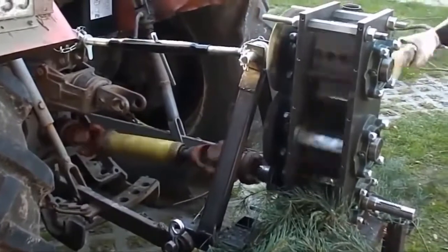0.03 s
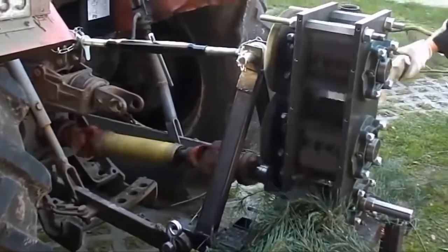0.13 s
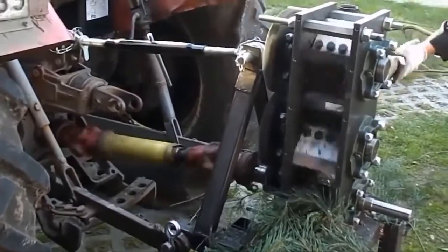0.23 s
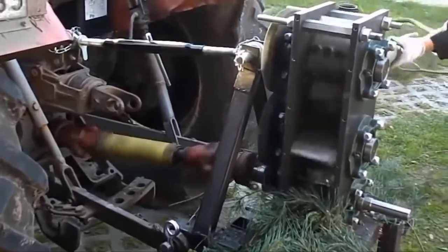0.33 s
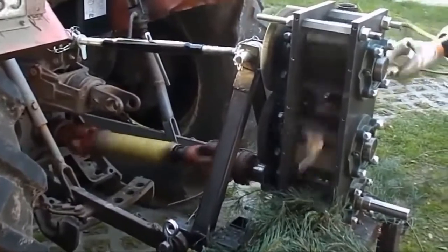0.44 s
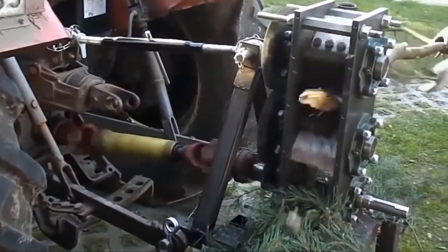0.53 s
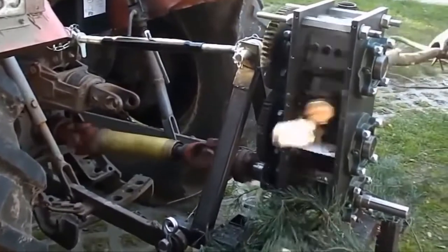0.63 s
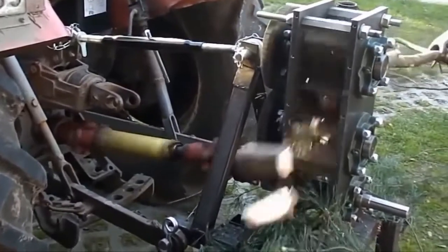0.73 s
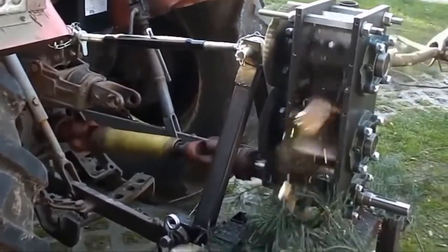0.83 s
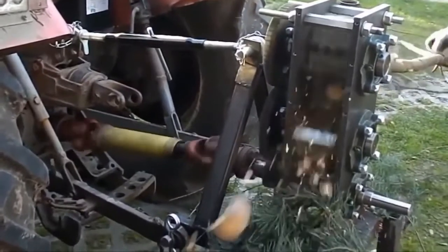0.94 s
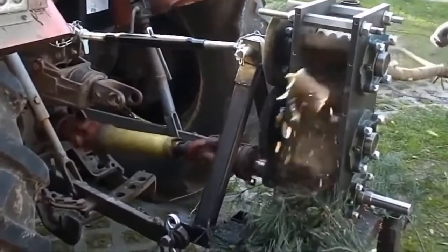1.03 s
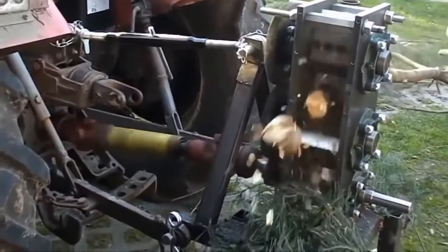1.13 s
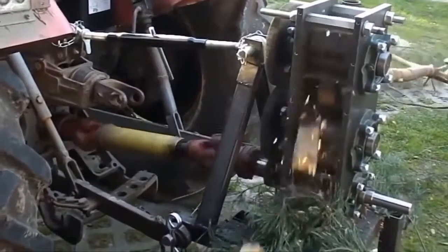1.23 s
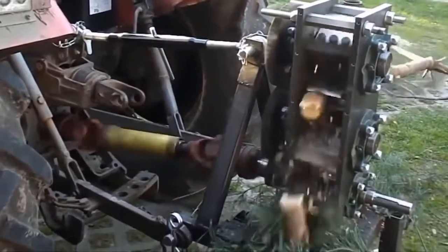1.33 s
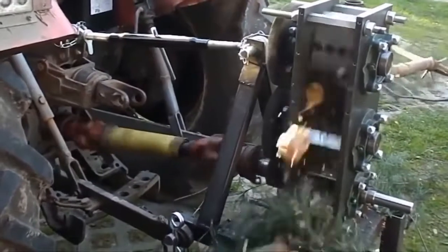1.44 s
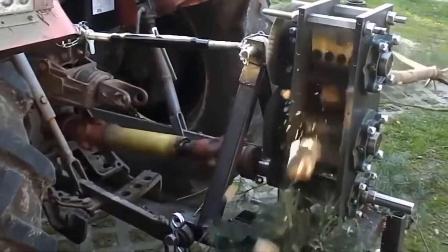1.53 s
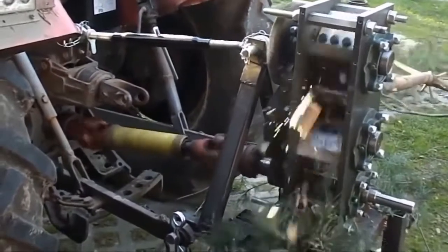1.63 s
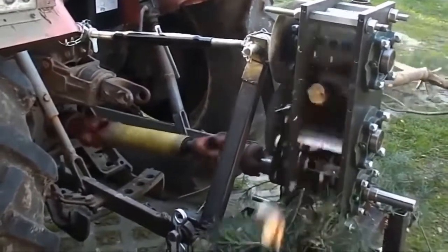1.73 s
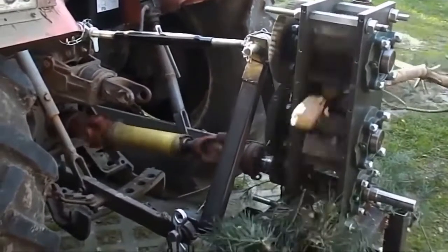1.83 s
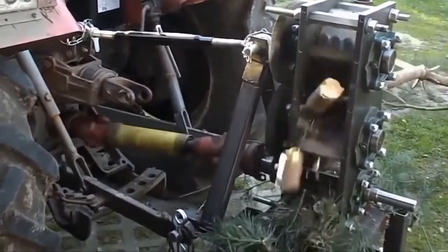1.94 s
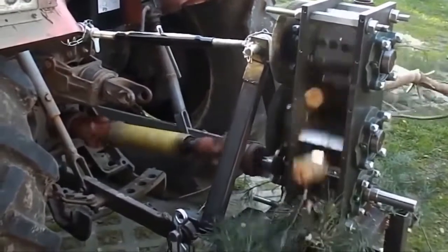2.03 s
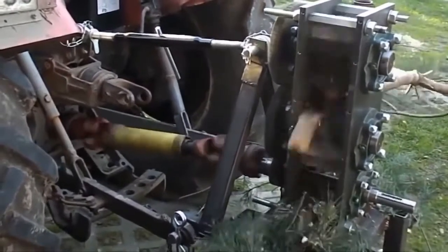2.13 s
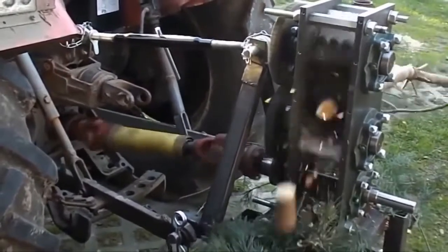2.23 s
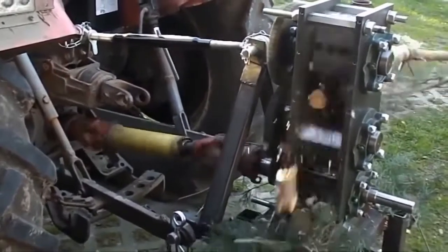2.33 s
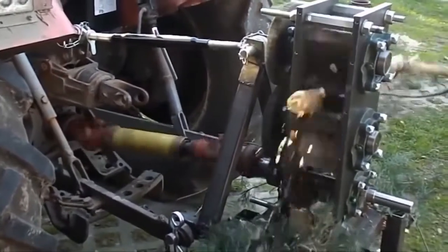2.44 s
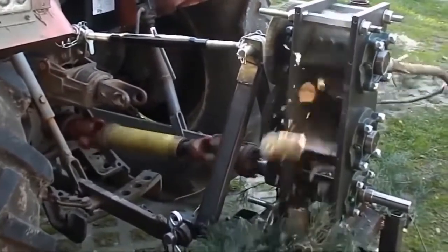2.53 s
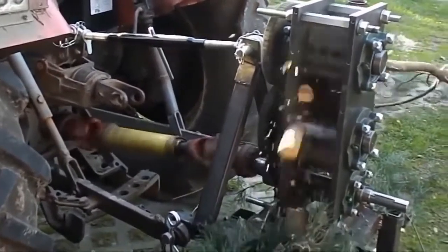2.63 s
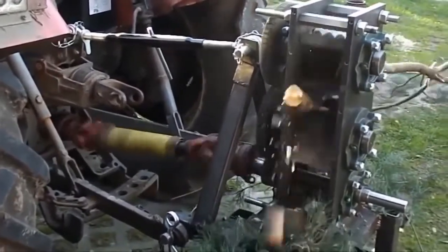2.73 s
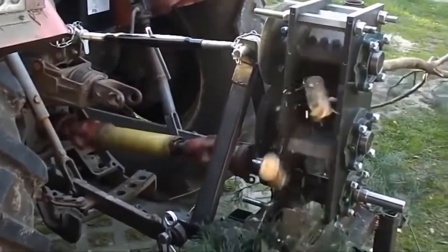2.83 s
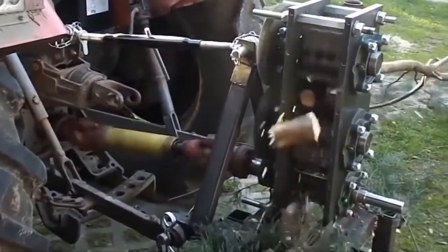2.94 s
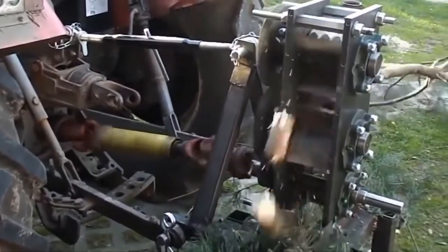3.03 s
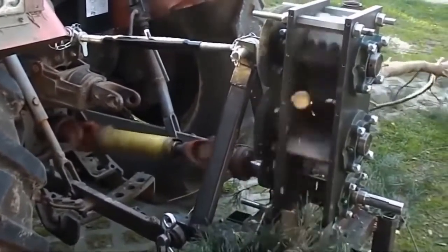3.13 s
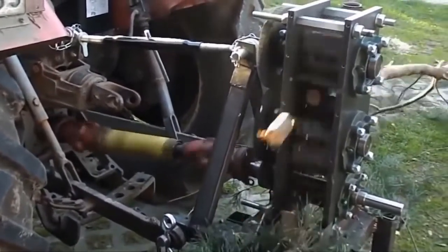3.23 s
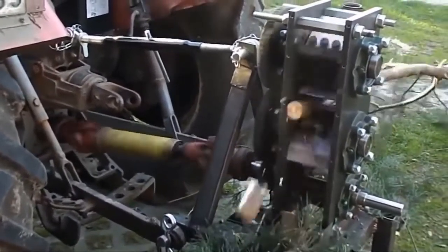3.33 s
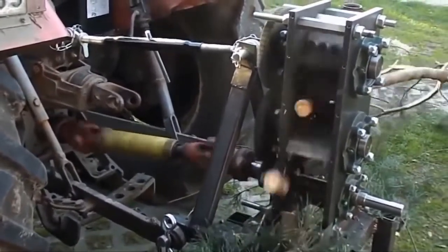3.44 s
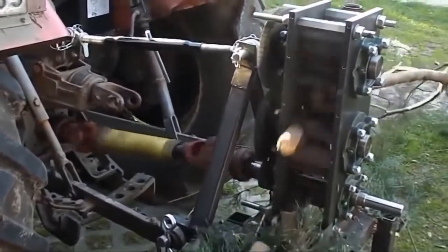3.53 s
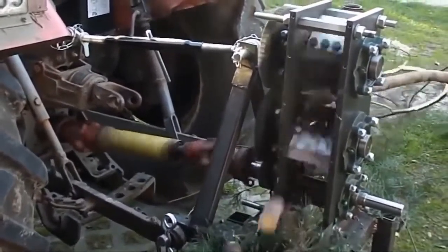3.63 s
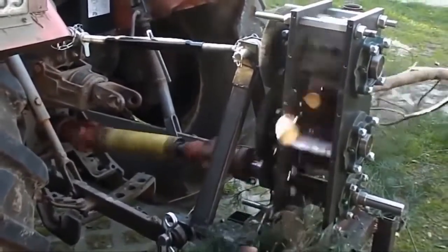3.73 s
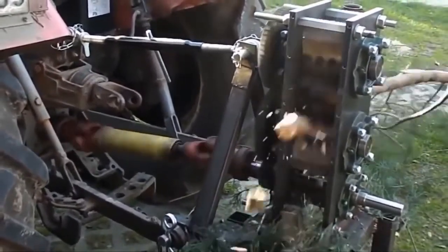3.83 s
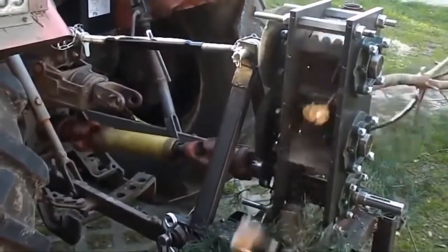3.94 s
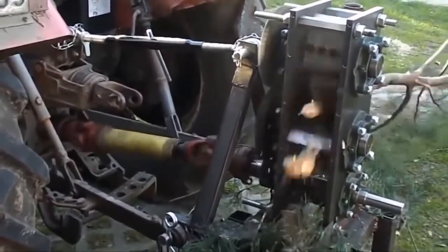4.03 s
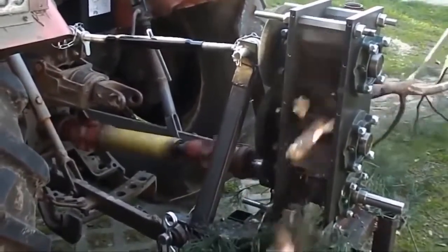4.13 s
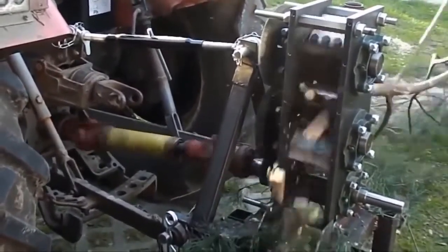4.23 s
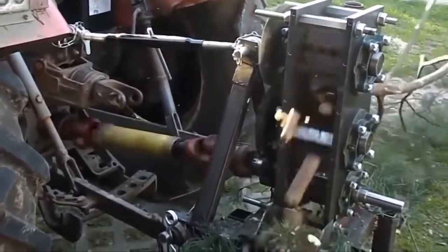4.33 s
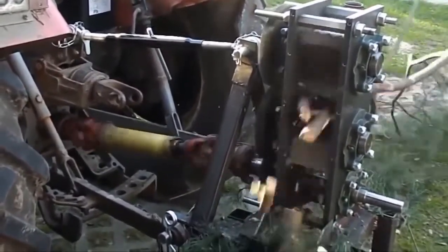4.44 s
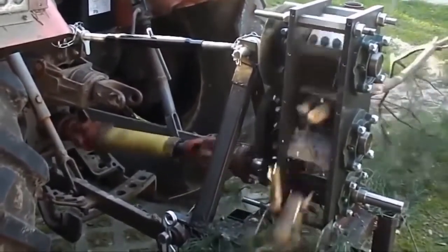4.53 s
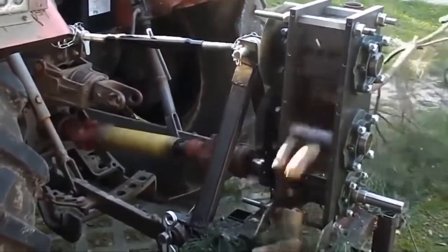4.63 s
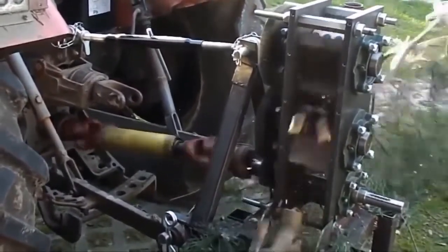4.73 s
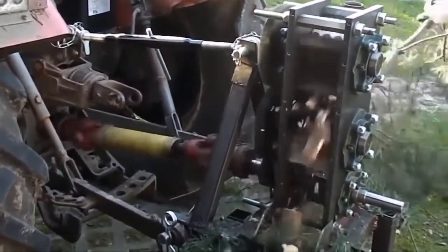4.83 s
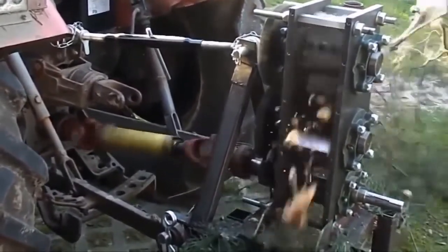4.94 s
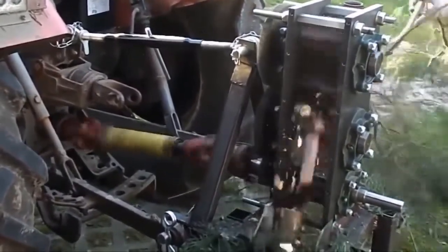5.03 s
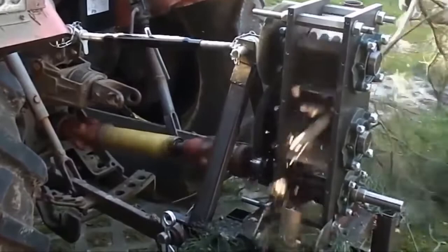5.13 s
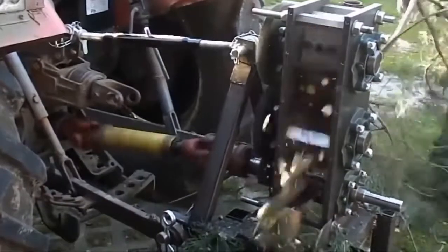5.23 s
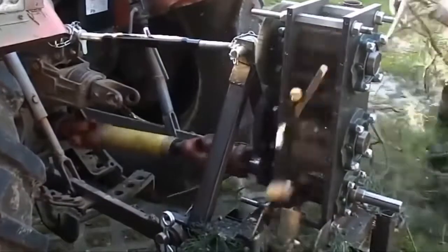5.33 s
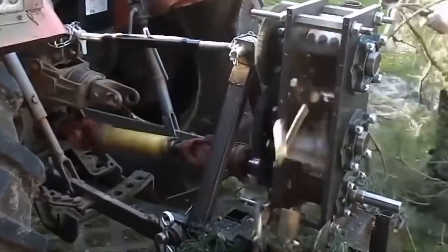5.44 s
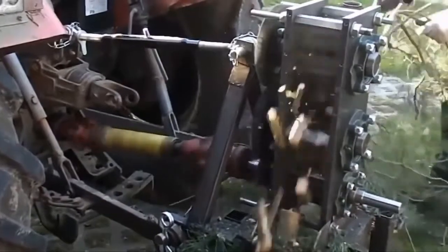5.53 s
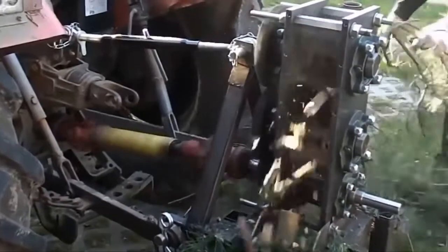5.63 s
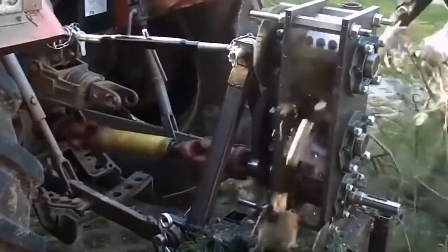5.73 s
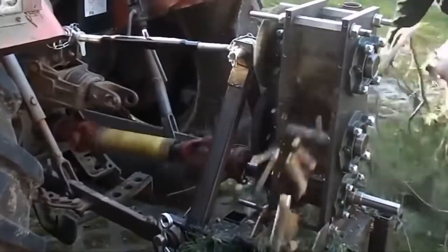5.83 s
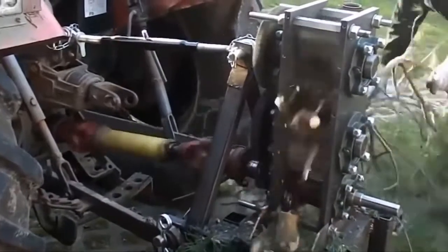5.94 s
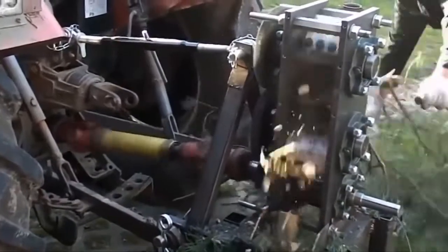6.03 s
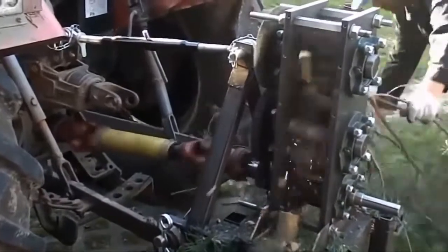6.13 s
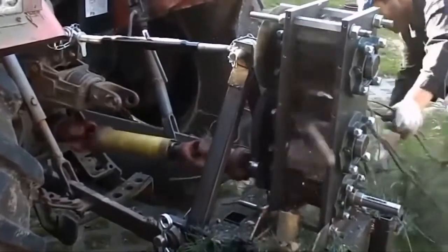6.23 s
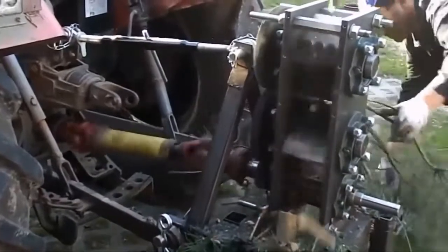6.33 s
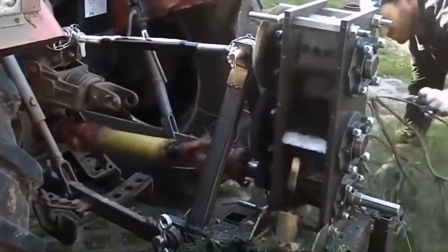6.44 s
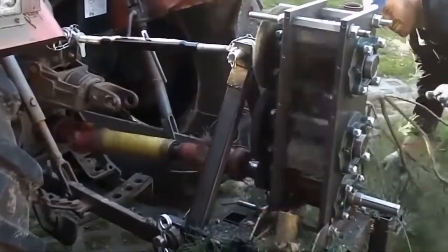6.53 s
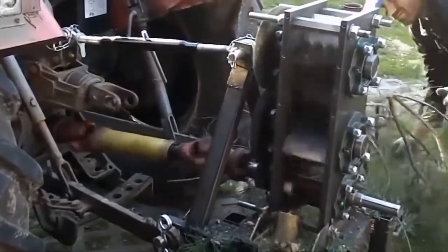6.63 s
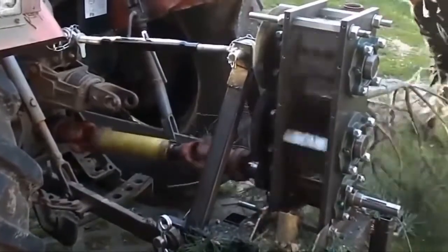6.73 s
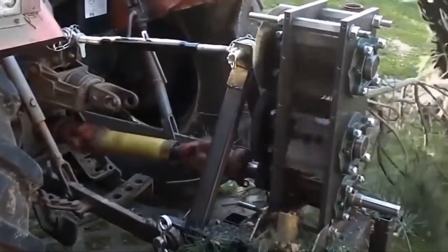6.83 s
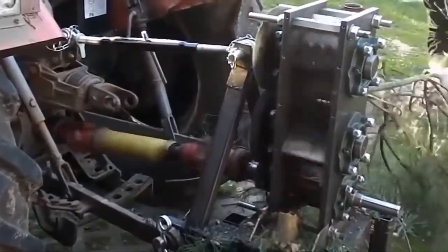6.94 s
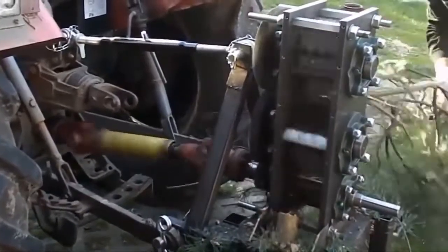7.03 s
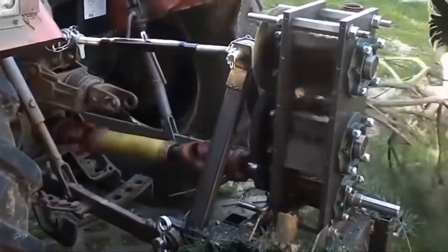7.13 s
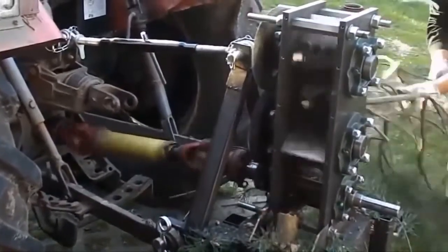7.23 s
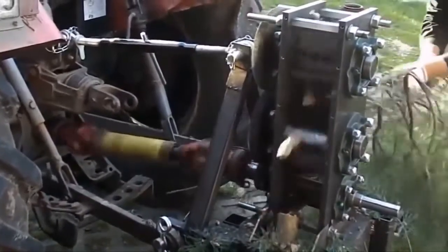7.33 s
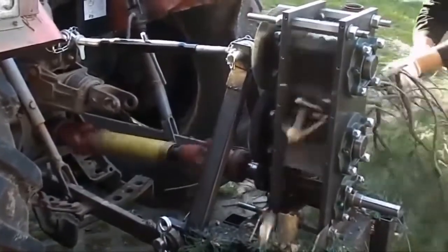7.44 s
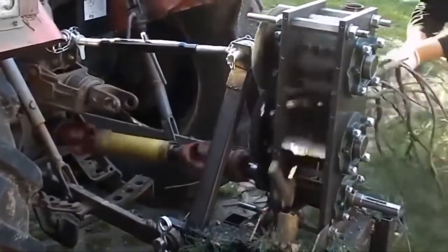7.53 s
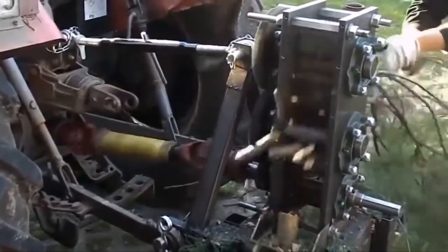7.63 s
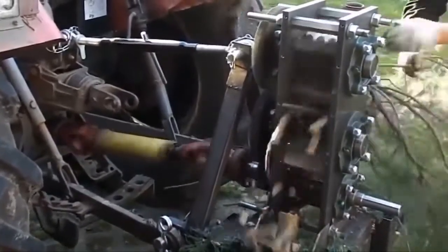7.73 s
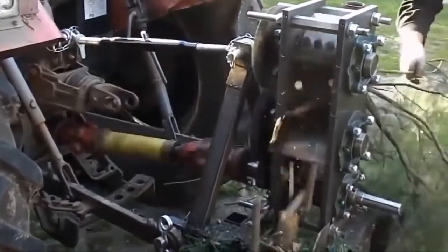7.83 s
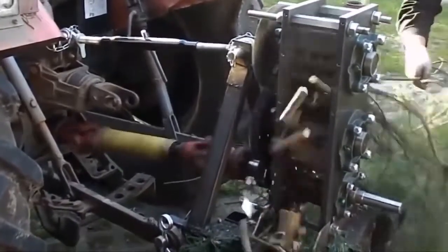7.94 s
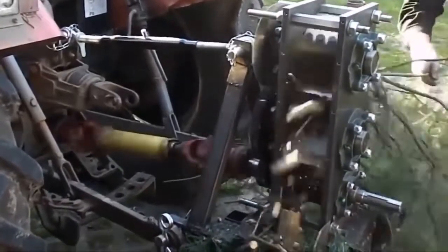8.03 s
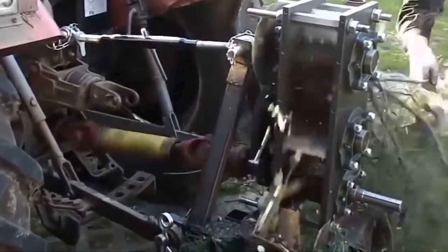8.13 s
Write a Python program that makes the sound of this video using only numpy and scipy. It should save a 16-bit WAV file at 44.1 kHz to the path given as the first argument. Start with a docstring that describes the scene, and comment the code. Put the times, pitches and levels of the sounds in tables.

```python
"""Tractor and wood chopper outdoors

A diesel tractor runs at low revs and turns a drum chopper through its power shaft, close by.
The knives cut wood about 6.5 times a second: noise bursts crush, crack and tear, and struck steel rings.
Each cut jolts the frame (a low damped swing) and slows the engine (firing knocks, ticks and panel hum).
Loose parts rattle, drive parts clank and cut pieces drop, all as short rings; a limiter ducks the loud peaks."""
import sys
import numpy as np
from scipy import signal
from scipy.fft import rfft, irfft
from scipy.io import wavfile
from scipy.ndimage import uniform_filter1d, minimum_filter1d

SR = 44100
rng = np.random.default_rng(int(sys.argv[2]) if len(sys.argv) > 2 else 0)


def wav_record(signal):
    """Record a signal, one row per channel, as 16-bit PCM in the file named by sys.argv[1]."""
    frames = np.transpose(np.atleast_2d(signal))
    bounded = np.clip(frames, -1, 1)
    # unit amplitude maps onto the largest positive 16-bit level
    quanta = np.round(bounded * 32767).astype(np.int16)
    wavfile.write(sys.argv[1], SR, quanta)


N = 360738


def undb(db):
    """Turn decibels into a gain."""
    return 10 ** (np.asarray(db) / 20)


def unit(x):
    """Scale to an average (rms) level of 1."""
    return x / np.sqrt(np.mean(x ** 2))


def add(track, s, sound):
    """Mix a sound into the track at time s, in seconds."""
    start = max(int(s * SR), 0)
    part = sound[:, :max(N - start, 0)]
    track[:, start:start + part.shape[1]] += part


def gains(points, size):
    """Draw a smooth curve through (pitch, level) points and read a gain for each transform bin."""
    hz, db = np.transpose(points)
    bins_hz = np.fft.rfftfreq(size, 1 / SR)
    return undb(np.interp(np.log(bins_hz + 1), np.log(hz), db))


def colour(x, points, size=4096):
    """Filter to the given spectrum without any sound before its cause; white noise keeps its power."""
    # folding the cepstrum forward in time makes the filter respond as early as it can
    cepstrum = irfft(np.log(gains(points, size)))
    cepstrum[1:size // 2] *= 2
    cepstrum[size // 2 + 1:] = 0
    response = irfft(np.exp(rfft(cepstrum)))
    response /= np.linalg.norm(response)
    return signal.fftconvolve(x, response[None])[:, :N]


def grit(size, spread_db, order=32):
    """Make mid and side noise from tiny grains of uneven strength, each `order` samples long."""
    grain_db = spread_db * np.clip(rng.standard_normal(size // order + 1), -2, 2)
    grains = np.repeat(undb(grain_db), order)[:size]
    return unit(grains * rng.standard_normal((2, size)))


def ring(modes, contact_s, scatter_db, detune):
    """Strike a body with (pitch, level, ring time) tones that die away; each blow lands on a different spot."""
    hz, db, t60 = np.transpose(modes)
    t = np.arange(int(t60.max() * SR)) / SR
    size = undb(db + scatter_db * rng.standard_normal(len(hz)))
    hz = hz * np.exp(detune * rng.standard_normal(len(hz)))
    # each tone falls by 60 dB in its t60
    waves = np.exp(np.outer(2j * np.pi * hz - np.log(1000) / t60, t))
    phases = np.exp(2j * np.pi * rng.random((2, len(hz))))
    weights = size / np.linalg.norm(size) * phases
    onset = 1 - np.exp(-t / contact_s)
    return np.sqrt(2) * (weights @ waves).imag * onset


def walk(rate):
    """Wander smoothly at random, with `rate` new values a second and a spread near 1."""
    return np.interp(np.arange(N) / SR * rate, np.arange(SR), 1.2 * rng.standard_normal(SR))


def yard(x, echo_db=-19, decay_s=0.043):
    """Ground, wheels and a wall scatter a short, dull echo, made of fading noise."""
    t = np.arange(SR // 3) / SR
    dull = signal.lfilter(*signal.butter(1, 4000, fs=SR), rng.standard_normal((2, len(t))))
    # the first echo takes 8 ms to come back
    response = dull * np.exp(-t / decay_s) * (t > .008)
    response /= np.linalg.norm(response[0])
    return x + undb(echo_db) * signal.fftconvolve(x, response, axes=1)[:, :N]


# tones of the loose linkage and guards: (pitch [Hz], level [dB], time to fall 60 dB [s])
LINKAGE_TONES = [(487, -4, 0.06), (777, -1, 0.041), (1105, 3, 0.039), (1335, 0.5, 0.038),
                 (1893, -4.5, 0.04), (2400, -1.5, 0.055)]


def rattles(rattle_db=-20, clink_db=-21, clink_spread_db=14, rattle_count=600, clink_count=90):
    """The linkage chatters all the time, and now and then the shaft joints clink, as small struck rings."""
    out = np.zeros((2, N))
    for when, size in rng.random((rattle_count, 2)):
        rattle = ring(LINKAGE_TONES, contact_s=.0006, scatter_db=3, detune=.14)
        add(out, when * N / SR, undb(rattle_db + 9 * (size - .5)) * rattle)
    modes = [(hz, db, share * .12) for hz, db, share in DRIVE_TONES]
    for when, size in rng.random((clink_count, 2)):
        clink = ring(modes, contact_s=.001, scatter_db=6, detune=.025)
        add(out, when * N / SR, undb(clink_db + clink_spread_db * (size - .5)) * clink)
    # the rattles and clinks carry no bass
    return signal.sosfilt(signal.butter(4, 260, "high", fs=SR, output="sos"), out)


def load(flywheel_s=.55):
    """Each cut brakes the flywheel, which slowly recovers; load 1 is a steady run of 0 dB cuts."""
    blows = np.zeros(N)
    for s, db, _ in CUTS:
        blows[int(s * SR)] += undb(db)
    spacing_s = np.median(np.diff(np.array(CUTS)[:, 0]))
    return signal.lfilter([spacing_s / flywheel_s], [1, -np.exp(-1 / (flywheel_s * SR))], blows)


# engine speed with no load, and how far it drops at load 1 [firings per second]
FREE_FIRING_HZ, SAG_HZ = 31.64, 1.9
# engine level with no load, and how much louder it works at load 1 [dB]
ENGINE_DB, LABOUR_DB = -22, 3.5
# strength of each cylinder's knock, in firing order: level [dB]
CYLINDER_LEVELS = [2, -1, -2, 1.2]
# clatter of block and gears: (pitch [Hz], level [dB per Hz])
CLATTER_SPECTRUM = [(24, -104), (40, -73), (81, -23), (137, -21.5), (392, 0), (646, -7), (790, 0),
                    (1150, -1.5), (1480, -13), (1900, -5.5), (2500, -13.5), (2770, -10.5), (3380, -16),
                    (6820, -28), (16000, -41)]
# tones of the castings and panels: (pitch [Hz], width [Hz], level [dB])
PANEL_TONES = [(355, 28, -9), (445.7, 8.2, -7), (703, 29, -7.5), (818, 26, -5), (933, 16, -7.5),
               (1127, 20, -1), (1165, 8.1, 1), (1216, 17, -13), (1322, 21, -0.5), (1550, 50, -5),
               (1903, 17, -9), (2440, 32, -7), (2600, 70, -33)]


def tractor(tick_db=-6, gear_db=-1, panel_db=-2.0, shudder_db=4.0, tick_count=24):
    """Firing knocks, valve and pump ticks and gear rattle are noise that shakes the block and its panels."""
    effort = load()
    firing = np.cumsum(FREE_FIRING_HZ - SAG_HZ * effort) / SR
    stroke = firing.astype(int)
    cylinder_db = np.array(CYLINDER_LEVELS)[stroke % len(CYLINDER_LEVELS)]
    strength = undb(cylinder_db + 0.46 * rng.standard_normal(SR)[stroke])
    # each knock fades until the next firing
    knocks = unit(strength * np.exp(-(firing % 1)) * rng.standard_normal((2, N)))

    # valves and injection pump strike at the same crank angles in every cycle
    cycle = firing / len(CYLINDER_LEVELS)
    angles_in_cycle = (np.arange(tick_count) + rng.random(tick_count)) / tick_count
    angles = (np.arange(int(cycle[-1]) + 1)[:, None] + angles_in_cycle).ravel()
    ticks = np.zeros(N)
    ticks[np.searchsorted(cycle, angles[angles < cycle[-1]])] = 1
    tick_fade = signal.lfilter([1], [1, -np.exp(-1 / (0.004 * SR))], ticks)
    ticks = unit(tick_fade * rng.standard_normal((2, N)))

    gears = rng.standard_normal((2, N))
    shake = knocks + undb(tick_db) * ticks + undb(gear_db) * gears
    panels = np.zeros((2, N))
    for hz, width, db in PANEL_TONES:
        tone = unit(signal.lfilter(*signal.iirpeak(hz, hz / width, fs=SR), shake))
        # every panel shudders on its own
        panels += undb(db + shudder_db * walk(18)) * tone
    engine = unit(colour(shake, CLATTER_SPECTRUM)) + undb(panel_db) * unit(panels)
    return unit(engine) * undb(ENGINE_DB + LABOUR_DB * effort)


def frame(jolt_db=-37, jolt_hz=72, jolt_s=0.0084, thick_db=4):
    """Every cut jolts the whole machine on its linkage: one low swing that dies at once."""
    out = np.zeros((2, N))
    t = np.arange(SR // 8) / SR
    for s, db, toughness in CUTS:
        hz = jolt_hz * np.exp(0.28 * rng.standard_normal((2, 1)))
        swing = np.sin(2 * np.pi * hz * t) * np.exp(-t / jolt_s)
        add(out, s, undb(db + jolt_db + thick_db * toughness) * swing)
    return out


# cut pieces drop on the frame: (time [s], level [dB])
BILLET_DROPS = [(5.754, -21), (6.285, -20), (6.635, -2.5)]
# tones of a dropped piece: (pitch [Hz], level [dB], time to fall 60 dB [s])
BILLET_TONES = [(365, -10, 0.061), (593, -12, 0.052), (710, -9, 0.033), (830, -7, 0.036), (1052, -2, 0.049),
                (1160, -11, 0.056), (1620, -15, 0.034)]


def billets():
    """Cut pieces land with a hollow knock, a handful of short wooden tones."""
    out = np.zeros((2, N))
    for s, db in BILLET_DROPS:
        add(out, s, undb(db) * ring(BILLET_TONES, contact_s=0.0021, scatter_db=0.5, detune=0.01))
    return out


def turning(sound, away_s=0.059, hidden_db=-8, fade_s=.005, radius_s=.00016, drum_hz=2.57, shimmer_db=3):
    """The drum swings its ringing knife past, bending the pitch, then hides it behind the housing."""
    t = np.arange(sound.shape[1]) / SR
    # the changing distance shifts the arrival time by up to radius_s
    path = t + radius_s * np.sin(2 * np.pi * (drum_hz * t + rng.random()))
    # reflections off the housing make the ring flutter
    flutter_db = shimmer_db * np.interp(t, np.arange(100) / 100, rng.standard_normal(100))
    shade_db = hidden_db * (1 + np.tanh((t - away_s) / (2 * fade_s))) / 2
    moved = np.array([np.interp(path, t, channel) for channel in sound])
    return moved * undb(flutter_db + shade_db)


# slack in the steel drive snaps shut: (time [s], relative level [dB], longest ring, time to fall 60 dB [s])
DRIVE_CLANKS = [(.136, -19, 0.11), (.386, -14, 0.13), (0.784, 0, .07), (.941, 1, .05), (1.05, 4, 0.047),
                (1.179, -14.5, 0.058), (1.408, -2, 0.099), (1.677, -7.5, .058), (1.799, -8, 0.11),
                (1.95, -8, 0.11), (2.06, -11.5, .1), (2.34, 2.5, .089), (2.925, -8, 0.06), (3.1, -5.5, 0.7),
                (3.289, -0.5, 0.091), (3.503, -8, 0.075), (3.712, -6.5, 0.24), (3.914, -8.5, 0.17),
                (3.983, -3.5, 0.11), (5.968, -8.5, .089), (6.497, -18, 0.17), (7.234, -20.5, 0.35)]
# tones of the drive parts: (pitch [Hz], level [dB], share of the ring time [0-1])
DRIVE_TONES = [(2460, -13, .4), (2700, -6, .45), (2735, -8, .5), (2790, 0, 1), (2850, -10, .3),
               (3155, -10, .45)]
# the dry clack of steel on steel: (pitch [Hz], level [dB per Hz])
CLACK_SPECTRUM = [(200, -27.5), (900, -6.5), (1900, -19), (2650, 0), (3150, -0.5), (3800, -15.5),
                  (9000, -31), (16000, -33)]


def clanks(ring_db=-1, clack_db=-4, clack_s=0.011):
    """Steel drive parts knock together: a dry burst of noise and a ring that turns with the drum."""
    rings, clacks = np.zeros((2, 2, N))
    t = np.arange(SR // 8) / SR
    for s, db, t60 in DRIVE_CLANKS:
        modes = [(hz, mode_db, share * t60) for hz, mode_db, share in DRIVE_TONES]
        steel = turning(ring(modes, contact_s=.0008, scatter_db=2, detune=.002))
        add(rings, s, undb(db + ring_db) * steel)
        add(clacks, s, undb(db + clack_db) * np.exp(-t / clack_s) * grit(len(t), 0.71))
    return rings + colour(clacks, CLACK_SPECTRUM)


def drum(modes):
    """A struck steel drum rings as it turns."""
    return turning(ring(modes, contact_s=.001, scatter_db=2, detune=.001))


def scrape(scrape_db=-7, scrape_s=0.039, scrape_hz=4350, width_hz=300):
    """The edges slide over each other for a moment: a fading narrow band of noise, like rough singing."""
    t = np.arange(SR // 4) / SR
    edges_hz = [scrape_hz - width_hz / 2, scrape_hz + width_hz / 2]
    band = signal.butter(2, edges_hz, "band", fs=SR, output="sos")
    rough = unit(signal.sosfilt(band, rng.standard_normal((2, len(t)))))
    return undb(scrape_db) * rough * np.exp(-t / scrape_s)


# the two edges touch: (time [s], knife drum relative level [dB], lower drum relative level [dB])
EDGE_TOUCHES = [(0.467, -14, -23), (0.782, -8.5, -36), (0.941, -2.5, -26), (1.25, -9, -30), (1.4, -11, -20),
                (1.711, 2, -4), (2.637, -13, -20), (2.945, -13, -23), (3.097, -6.5, -14.5),
                (3.25, -13, -17.5), (3.709, -4.5, -15), (6.163, -18, -27), (7.231, -20, -26),
                (7.368, -20.5, -22), (7.677, -29, -19)]
# tones of the lower drum: (pitch [Hz], level [dB], time to fall 60 dB [s])
LOWER_DRUM_TONES = [(3914, -11, .4), (4176, 0, .33), (4215, -10, .12)]


def touches(knife_trim_db=-3, lower_trim_db=-2):
    """The two edges touch and scrape, and both steel drums ring out."""
    out = np.zeros((2, N))
    for s, knife_db, lower_db in EDGE_TOUCHES:
        add(out, s, undb(knife_db + knife_trim_db) * drum(KNIFE_TONES))
        add(out, s, undb(knife_db + knife_trim_db) * scrape())
        add(out, s, undb(lower_db + lower_trim_db) * drum(LOWER_DRUM_TONES))
    return out


# knife cuts and snapping twigs: (time [s], relative level [dB], toughness [0-1])
# brittle wood (0) snaps clean, tough wood (1) is crushed and tears
CUTS = [ (.467, -17, 1), (.619, -1.5, .65), (.781, -2, 0.024), (.94, -3, 0.38), (1.084, 0, 0.41),
        (1.25, -3, .7), (1.4, -1, 0.6), (1.559, -1.5, 0.43), (1.711, 0, 0.017), (1.87, -4, 0.75),
        (2.022, -6.5, 0.87), (2.176, -4, .5), (2.336, -6.5, 1), (2.491, 2.5, 0), (2.636, 0, .4),
        (2.791, -1.5, 0.092), (2.943, -5.5, .7), (3.097, -6.5, .35), (3.249, -4.5, 0), (3.401, -8.5, 0.61),
        (3.554, -7, 0.35), (3.708, -9, .8), (3.861, -9, 0.87), (3.98, -9, 0.29), (4.017, -2.5, .65),
        (4.173, -8.5, 0.69), (4.325, -6.5, .6), (4.479, -7.5, 0.45), (4.628, -9.5, .7), (4.76, -19, 0.96),
        (4.783, -7.5, 0.52), (4.877, -11, 0.88), (4.897, -10, .6), (4.92, -7, .95), (5.054, -18, 0.32),
        (5.092, -9, 0.68), (5.247, -8.5, 0.5), (5.397, -6, 0.49), (5.548, -10, 0.74), (5.674, -14, 0.73),
        (5.695, -12, .7), (5.853, -12, 0.78), (5.985, -14, 0.75), (6.012, -11.5, .6), (6.164, -7, 0.092),
        (6.318, -17, .6), (6.47, -18.5, .7), (7.231, -26.5, 1), (7.37, -17.5, 1), (7.522, -10.5, 0.35),
        (7.677, -7, 0.53), (7.828, -9.5, 0.82), (7.98, -8.5, 0.65), (8.134, -14.5, .9)]
# how thick the wood in the knives is; thick butts knock harder than thin tops: (time [s], level [dB])
WOOD_BULK = [(.5, 0), (2.2, 1.5), (2.8, -1), (4.4, 0.5), (5.3, -2), (5.8, -0.5), (7.4, -4.5), (8.18, -1.5)]
# snapping fibres: (pitch [Hz], level [dB per Hz])
SPLINTER_SPECTRUM = [(300, -31), (1200, -11.5), (2400, 0.5), (3500, -0.5), (4900, 2), (6300, -6),
                     (8400, -6), (10300, -9), (13000, -6), (16000, -14)]
# thud of branch and housing: (pitch [Hz], level [dB per Hz])
THUD_SPECTRUM = [(30, -32), (150, -24), (300, -8), (500, -3), (690, 6), (900, -1), (1250, 0.5), (1800, -4),
                 (2400, -4), (3300, -5), (5500, -28.5), (12000, -25.5)]
# tones of a piece breaking free; its size changes the pitch: (pitch [Hz], level [dB], time to fall 60 dB [s])
BRANCH_TONES = [(700, -7, 0.19), (1181, -5, 0.12), (1595, -12, 0.13), (2456, 5, 0.061), (3170, -6, 0.1),
                (4755, 0, 0.033)]
# tones of the knife drum: (pitch [Hz], level [dB], time to fall 60 dB [s])
KNIFE_TONES = [(2790, -9, .25), (4176, -12, .3), (4382, 0, .45), (4398, -8, .3), (4440, -12, .14),
               (4700, -17, .15), (7170, -27, .15), (8500, -20, .18)]
# what toughness does, as (brittle, tough): crushing before the crack [dB], fading of the tearing [s],
# and the woody knock before the bulk is added [dB]
CRUSH_DB, SPLINTER_S, KNOCK_DB = (-26, -5.5), (.009, .022), (-3, -0.5)


def chopper(crack_db=1, crack_s=0.002, splinter_db=-2, thud_db=-1, thud_s=0.022, branch_db=-2, again_db=-8,
            crush_s=0.015, crackle_db=-4, creak_db=-2, chips_db=-24, chips_s=0.041, knife_ring_db=-16.5):
    """Each knife squeezes the branch, cracks through it, tears the last fibres and is left ringing."""
    fibres, wood, rings = np.zeros((3, 2, N))
    t = np.arange(SR // 4) / SR
    for s, db, toughness in CUTS:
        crush_db = np.interp(toughness, (0, 1), CRUSH_DB)
        splinter_s = np.interp(toughness, (0, 1), SPLINTER_S)
        bulk_db = np.interp(s, *np.transpose(WOOD_BULK))
        knock_db = np.interp(toughness, (0, 1), KNOCK_DB) + bulk_db

        # crackle and creak swell while the edge sinks in
        squeeze = undb(db + crush_db) * np.exp(-t[::-1] / crush_s)
        add(fibres, s - len(t) / SR, undb(crackle_db) * squeeze * grit(len(t), 1.5))
        add(wood, s - len(t) / SR, undb(creak_db) * squeeze * grit(len(t), 3.2))

        snap = undb(crack_db) * np.exp(-t / crack_s) * grit(len(t), 0.7)
        tear = undb(splinter_db) * np.exp(-t / splinter_s) + undb(chips_db) * np.exp(-t / chips_s)
        bundles = grit(len(t), 3, order=60)
        add(fibres, s, undb(db) * (snap + tear * bundles))
        thud = np.exp(-t / thud_s) * grit(len(t), 0.85, order=100)
        add(wood, s, undb(db + knock_db + thud_db) * thud)

        # the wood gives way in three steps, each with its own hollow note
        later_steps = [(late, again_db) for late in rng.random(2) * splinter_s]
        for late_s, step_db in [(0, branch_db), *later_steps]:
            note = ring(BRANCH_TONES, contact_s=.0003, scatter_db=4, detune=.07)
            add(rings, s + late_s, undb(db + knock_db + step_db) * note)
        add(rings, s, undb(db + knife_ring_db) * drum(KNIFE_TONES))
    return colour(fibres, SPLINTER_SPECTRUM) + colour(wood, THUD_SPECTRUM) + rings


# stereo width, side against mid: (pitch [Hz], level [dB])
STEREO_WIDTH = [(40, -9), (250, -18), (600, -16), (1100, -12), (2200, -8), (4200, -5), (8000, 0),
                (13000, -3.5)]
# stereo balance, left against right: (pitch [Hz], level [dB])
STEREO_LEAN = [(60, 0), (250, 0.1), (550, 2.5), (1100, 2), (2400, 0.8), (8000, 2.5), (13000, 0.5)]


def scene():
    """Mix all sources as mid and side, then make left and right: the treble is wide, the whole leans left."""
    sources = tractor() + rattles() + frame() + billets() + clanks() + touches() + chopper()
    mid, side = rfft(yard(sources))
    side = side * gains(STEREO_WIDTH, N)
    lean = np.sqrt(gains(STEREO_LEAN, N))
    return irfft(np.array([(mid + side) * lean, (mid - side) / lean]), N)


def record(dry, ceiling_db=-8, release_db_per_s=32, size=88, top_hz=16150):
    """A limiter looks ahead, clamps at once and recovers slowly; peaks are rounded and the top is cut."""
    # the level is averaged over `size` samples, about 2 ms
    power = uniform_filter1d(np.mean(dry ** 2, axis=0), size)
    over_db = np.maximum(10 * np.log10(np.abs(power) + 1e-12) - ceiling_db, 0)
    recovery = release_db_per_s * np.arange(N) / SR
    duck_db = np.maximum.accumulate(over_db + recovery) - recovery
    gain_db = uniform_filter1d(minimum_filter1d(-duck_db, 2 * size), size)
    limited = dry * undb(gain_db)
    rounded = 1.2 * np.tanh(limited / 1.2)
    return signal.sosfilt(signal.ellip(10, .2, 80, top_hz, fs=SR, output="sos"), rounded)


dry = scene()
out = record(dry)
wav_record(out)
```